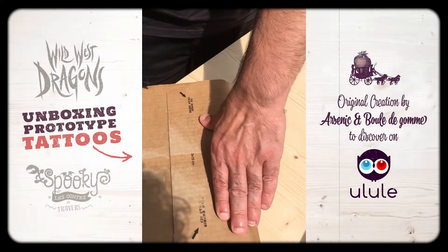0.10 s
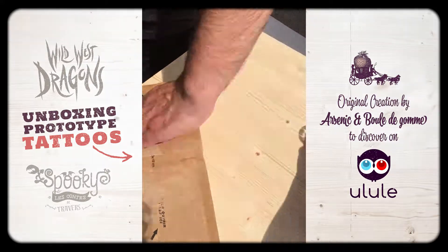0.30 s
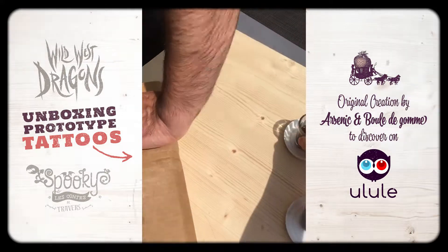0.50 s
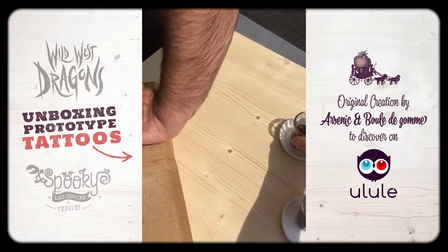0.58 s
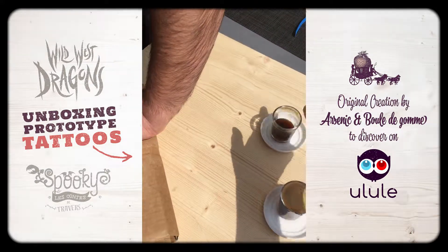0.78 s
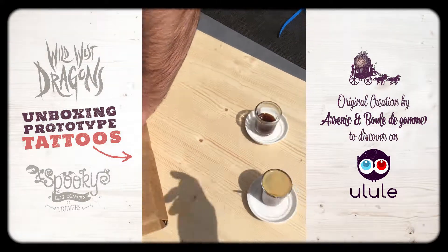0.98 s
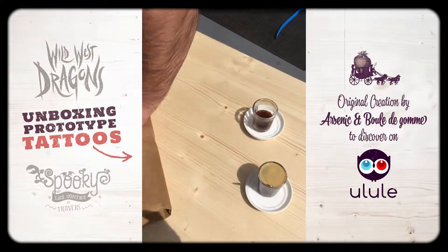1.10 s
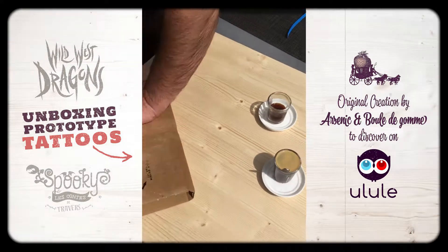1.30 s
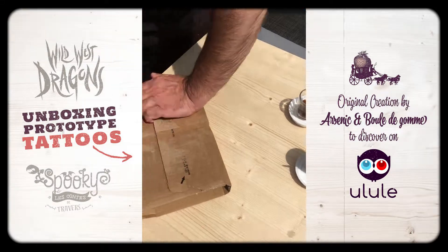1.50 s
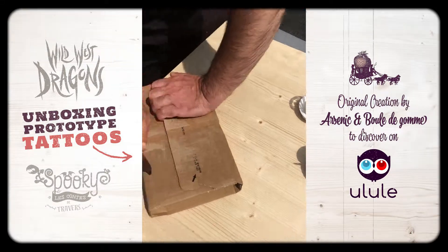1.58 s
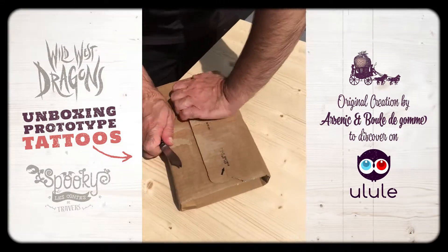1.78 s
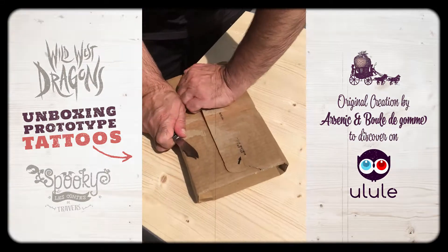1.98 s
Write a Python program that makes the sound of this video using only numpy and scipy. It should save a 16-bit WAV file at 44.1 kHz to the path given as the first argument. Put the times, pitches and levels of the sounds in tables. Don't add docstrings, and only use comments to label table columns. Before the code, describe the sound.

A cardboard parcel is handled and cut open on a wooden table, heard close. Palm rubbing and scraping open, with sharp snaps near 0.2 seconds. A blade clinks and knocks brightly at 0.41, then a dull hand thump at 0.68. Rubbing swells towards 1.0; a loud crack at 1.16 leads to crackly rips until 1.42, more snaps around 1.55, and steady rubbing to the end over quiet air.

```python
import sys
import numpy as np
from scipy import signal
from scipy.io import wavfile

SR = 44100
rng = np.random.default_rng(int(sys.argv[2]) if len(sys.argv) > 2 else 0)


def decibels_to_gain(level_db):
    exponent = np.asarray(level_db, float) / 20
    return 10 ** exponent


def put_to_file(sound):
    columns = np.atleast_2d(sound).T
    safe = np.clip(columns, -1, 1)
    whole_steps = np.round(safe * 32767)
    wavfile.write(sys.argv[1], SR, whole_steps.astype(np.int16))


N = 88200

# time_s, level_db
PALM_RUBS = [
    (0, -48),
    (.09, -46.5),
    (.125, -64),
    (.165, -57),
    (.2, -40),
    (.24, -57.5),
    (.27, -51.5),
    (.285, -65.5),
    (.41, -76),
             (.42, -55.5),
    (.54, -58.5),
    (0.574, -73),
    (0.598, -48.5),
    (0.709, -44),
    (.745, -64.5),
    (0.789, -48.5),
    (.85, -60),
    (0.998, -44.5),
             (1.1, -57),
    (1.21, -56.5),
    (1.33, -46),
    (1.44, -47.5),
    (1.49, -61),
    (1.598, -44.5),
    (1.75, -50.5),
    (1.9, -46.5),
    (2, -44.5),
]
# frequency_hz, level_db (per Hz)
SKIN_TONE = [(290, -5.5), (500, -16.5), (1360, -5.5), (1840, -6.5), (3490, -10), (5020, -15), (5880, -5.5),
             (13100, -10.5), (16000, 36.5)]
# time_s, level_db
DRAG = [(0, -53.5), (.1, -52.5), (.13, -64.5), (.2, -50), (.3, -99), (.4, -63), (.44, -64.5), (.57, -64.5),
        (.68, -76), (.75, -56), (.87, -51.5), (.93, -51), (1.01, -45), (1.2, -55.5), (1.33, -46),
        (1.5, -59), (1.6, -55), (2, -53)]
# frequency_hz, level_db (per Hz)
WOOD_TONE = [(71, -30), (120, -13), (290, -9), (498, -21.5), (627, -17), (738, -19), (1010, -12.5),
             (3790, -21.5), (6000, -28), (7800, -36), (13200, -120)]
# start_s, peak_db, pitch_hz, thud_db
FIBRE_SNAPS = [(.084, -36.5, 2830, -45.5), (.135, -41.5, 7000, -51), (.1415, -35.5, 11000, -52.5),
               (.142, -40, 3500, -58), (.172, -40, 6000, -77), (.1805, -37, 3530, -46),
               (.188, -39, 5000, -63), (.1935, -50, 3000, -70), (.199, -37, 9400, -59),
               (.205, -35, 6000, -64), (.2128, -19, 6100, -38), (.2135, -21.5, 12100, -60),
               (.2145, -22.5, 1060, -56), (.2152, -24, 600, -61), (.2158, -18, 8000, -38.5),
               (.265, -37, 12100, -54.5), (.2732, -24.5, 11600, -54), (.274, -36.5, 890, -46.5),
               (.8628, -34, 1150, -66), (.875, -35, 990, -70), (.884, -56, 1200, -70),
               (1.1335, -41.5, 6000, -75), (1.1372, -35, 2000, -71), (1.1415, -35, 5800, -66),
               (1.149, -33, 2100, -68), (1.1499, -38, 6000, -72), (1.1627, -38, 5800, -73),
               (1.1627, -32, 2800, -70), (1.166, -33, 5800, -67), (1.1662, -37, 2400, -56),
               (1.2805, -38, 9500, -49), (1.2811, -30, 1800, -51), (1.5125, -40.5, 3100, -70),
               (1.5328, -34, 2400, -58), (1.5638, -26, 1300, -45), (1.6028, -30, 2180, -62),
               (1.6049, -28, 4050, -65), (1.6066, -29, 2280, -51), (1.6083, -37, 5550, -73),
               (1.6143, -34, 8500, -60), (1.779, -45, 4000, -62)]
# start_s, peak_db, pitch_hz, thud_db
CRACKS = [
    (0.4118, -16.5, 1930, -46),
    (.413, -15, 1340, -66),
    (0.4175, -22.5, 2230, -56),
    (0.42, -28, 3050, -74),
    (.4115, -19.5, 6200, -40),
    (.6795, -31, 1300, -46.5),
    (.681, -32.5, 780, -72),
    (.6865, -39, 2300, -55),
    (.6802, -40, 4000, -69),
]
# start_s, peak_db, pitch_hz, thud_db
BREAKS = [
    (1.1549, -22.5, 5700, -59),
    (1.1559, -23.5, 2250, -74),
    (1.1562, -11.5, 7530, -72),
    (1.1575, -35, 8900, -63),
    (1.3522, -26, 2200, -62),
    (1.3525, -30.5, 4630, -68),
    (1.3861, -35, 3900, -70),
    (1.5637, -27, 3000, -43.5),
    (1.5645, -35, 6000, -73),
]
# start_s, peak_db, pitch_hz, thud_db
RIPS = [(1.239, -35, 2030, -60), (1.243, -37, 2020, -50), (1.2995, -33.5, 4500, -73),
        (1.3035, -31, 3600, -60), (1.3045, -34, 8000, -70), (1.309, -37.5, 6500, -68),
        (1.313, -36, 3500, -66), (1.3185, -34, 3300, -65), (1.322, -35, 5000, -70), (1.327, -29, 5370, -73),
        (1.3365, -27, 3800, -68), (1.345, -37, 4020, -67), (1.3535, -37, 1400, -54),
        (1.360, -34, 9500, -70), (1.361, -25, 2500, -70), (1.364, -38, 6800, -70),
        (1.396, -41.5, 4000, -57), (1.402, -36, 3300, -72), (1.419, -37, 4500, -51)]
# pitch_hz, level_db, t60_s (time to fade by 60 dB)
CARD_MODES = [(169, -9.5, 0.09), (254, -4.5, 0.013), (350, 4, 0.018), (660, -11.5, 0.017), (977, 5, 0.019),
              (1500, 1.5, 0.01)]
# start_s, level_db
CLINKS = [
    (.4116, -34),
    (.4124, -14),
    (.4172, -28.5),
]
# pitch_hz, level_db, t60_s
BLADE_MODES = [(5280, -4, .09), (5279, -3, .024), (5345, -18, .03), (5560, -18, .03), (6430, -17, .015),
               (6790, -14, .015), (9200, -15, .03), (9310, -7, .03), (9415, 4, .035), (9548, -1, .045),
               (9760, -13, .035), (11820, -26, .11), (13330, -24, .025), (15560, -21, .06)]
# pitch_hz, level_db, t60_s
KNOCK_MODES = [(140, -23, .09), (215, -25.5, 0.16), (262, -25, 0.1), (382, -29, 0.18), (448, -23, 0.04),
               (1075, -3.5, 0.015), (1310, -9, .018), (1675, -8.5, 0.017), (2030, -10.5, .02),
               (2230, -7.5, 0.02), (2650, -18, .016), (3160, -19, .018), (3535, -20, .018)]
# start_s, level_db
THUMPS = [
    (.681, -25.5),
    (.6848, -27.5),
    (.693, -34.5),
    (.708, -50),
]
# pitch_hz, level_db, t60_s
TABLE_MODES = [(226, 3.5, 0.033), (264, -8, .03), (320, -13, 0.041)]
# peak_s, level_db, pitch_hz, length_s
ROCKS = [(.035, -49, 137, 0.075), (.155, -46.5, 298, 0.026), (.44, -42.5, 260, 0.043),
         (.47, -50, 215, 0.049), (.82, -53, 312, 0.073), (1.0, -46, 290, .06), (1.17, -49, 320, .06),
         (1.287, -39, 313, 0.013), (1.287, -43, 160, .05), (1.42, -44.5, 184, 0.035),
         (1.568, -49, 150, 0.058), (1.63, -46.5, 92, 0.062), (1.80, -56, 149, 0.078)]
# frequency_hz, level_db (per Hz)
AIR_TONE = [(15, -34), (25, 6), (59, 15.5), (317, -8), (463, -4.5), (1330, -28.5), (4870, -13.5),
            (11900, -19.5), (16000, -22)]


def rms_one(x):
    return x / np.sqrt(np.mean(x ** 2) + 1e-20)


def level(rows):
    return decibels_to_gain(np.interp(np.arange(N) / SR, *np.transpose(rows)))


def drift(rate_hz):
    r = np.exp(-80 * np.pi * rate_hz / SR)
    noise = rng.standard_normal(N // 40 + 2002)
    slow = signal.lfilter([1], [1, -2 * r, r * r], noise)[2000:]
    return np.interp(np.arange(N) / 40, np.arange(len(slow)), rms_one(slow))


def bandpass(x, edges_hz):
    return signal.sosfilt(signal.butter(2, edges_hz, "band", fs=SR, output="sos"), x)


def friction(tone, patchy_db, grain_db):
    out, together = 0, drift(14)
    edges = 22 * 2 ** np.arange(0, 9.8, .5)
    grain = np.repeat(rng.exponential(1, N // 20 + 1), 20)[:N]
    rough = rng.standard_normal((2, N)) * decibels_to_gain(grain_db * grain)
    hz, db = np.transpose(tone)
    for k, (low, high) in enumerate(zip(edges, edges[1:])):
        band = bandpass(rough[k % 2], [low, high])
        colour_db = np.interp(np.log(low * high) / 2, np.log(hz), db, left=-90, right=-90)
        flicker_db = patchy_db * (.8 * together + .6 * drift(20))
        out = out + band * decibels_to_gain(colour_db + flicker_db)
    return rms_one(out)


def palm_on_card():
    return level(PALM_RUBS) * friction(SKIN_TONE, patchy_db=2.27, grain_db=1.5)


def parcel_on_wood():
    return level(DRAG) * friction(WOOD_TONE, patchy_db=2.5, grain_db=1.5)


def strike(hits, modes, spread_db, rise_s=.0001):
    out, (start_s, db) = np.zeros(N), np.transpose(hits)
    luck = rng.standard_normal((len(modes), len(start_s)))
    for (hz, mode_db, t60_s), mode_luck in zip(modes, luck):
        clicks = np.full(N, 1e-18)
        clicks[(start_s * SR).astype(int)] = decibels_to_gain(db + mode_db + spread_db * mode_luck)
        w = 2 * np.pi * hz / SR
        for sign, fade_s in ((1, t60_s), (-1, rise_s)):
            r = decibels_to_gain(-60 / (fade_s * SR))
            out += sign * signal.lfilter([0, np.sin(w)], [1, -2 * r * np.cos(w), r * r], clicks)
    return out


def snaps(rows, broad_db, t60_s, low_hz, first=3.94, rise_s=.0001):
    length, width = 2000, 1.26
    out, t = np.zeros(N + length), np.arange(length) / SR
    broad_filter = signal.butter(1, [low_hz, 7000], "band", fs=SR)
    for start_s, db, hz, _ in rows:
        noise = rng.standard_normal(length)
        spray = noise * np.abs(noise) * np.minimum(t / rise_s, 1)
        spray = (spray + first * (t == 0)) * decibels_to_gain(-60 * t / t60_s)
        pitched = bandpass(spray, np.clip([hz / width, hz * width], 100, .45 * SR))
        snap = pitched + decibels_to_gain(broad_db) * signal.lfilter(*broad_filter, spray)
        start = int(start_s * SR)
        out[start:start + length] += decibels_to_gain(db) * snap / np.abs(snap).max()
    thuds = [(start_s, thud_db) for start_s, _, _, thud_db in rows]
    return out[:N] + strike(thuds, CARD_MODES, spread_db=4.0)


def fibres():
    out = snaps(FIBRE_SNAPS, -11, t60_s=.0077, low_hz=674)
    out += snaps(CRACKS, -23, t60_s=.0077, low_hz=674)
    out += snaps(BREAKS, -10, t60_s=.0052, low_hz=1690, first=11.0)
    out += snaps(RIPS, -1.3, t60_s=.013, low_hz=1690, first=0, rise_s=.0016)
    return out


def blade_clink():
    ring = strike(CLINKS, BLADE_MODES, spread_db=1.5, rise_s=.0036)
    return ring + strike(CLINKS, KNOCK_MODES, spread_db=1.5)


def table_thump():
    damping = level([(.697, 0), (.703, -9)])
    return strike(THUMPS, TABLE_MODES, spread_db=1.5, rise_s=.0034) * damping


def rocking():
    out, t = np.zeros(N), np.arange(N) / SR
    sag = .1
    for peak_s, db, hz, length_s in ROCKS:
        u = (t - peak_s) / length_s
        cycles = hz * length_s * (u - sag * u ** 2 / 2)
        out += decibels_to_gain(db) * np.exp(-8 * u ** 2) * np.sin(2 * np.pi * cycles)
    return out


def crackle(force):
    per_s, t60_s, pitches = 1500, .004, np.geomspace(800, 7000, 12)
    born = rng.random(N) < per_s * decibels_to_gain(3.0 * drift(12)) / SR
    sizes = decibels_to_gain(1.9 * np.minimum(rng.exponential(1, N), 4))
    pops = born * sizes * rng.choice([-1, 1], N) * force
    dealt = rng.integers(0, 12, N)
    out, r = 0, decibels_to_gain(-60 / (t60_s * SR))
    for k, hz in enumerate(pitches):
        w = 2 * np.pi * hz / SR
        mine = pops * (dealt == k) + 1e-18
        out = out + signal.lfilter([np.sin(w)], [1, -2 * r * np.cos(w), r * r], mine)
    return decibels_to_gain(-10) * out


def room(x):
    t60_s, room_db = .083, -20
    t = np.arange(SR // 4) / SR
    dull = signal.lfilter([1], [1, -.7], rng.standard_normal(len(t)))
    tail = dull * decibels_to_gain(-60 * t / t60_s) * (t > .004)
    return decibels_to_gain(room_db) * signal.fftconvolve(x, tail / np.linalg.norm(tail))[:N]


def open_air():
    return decibels_to_gain(-58.5) * friction(AIR_TONE, patchy_db=1.0, grain_db=1.7)


def scene():
    rub = palm_on_card() + parcel_on_wood()
    hits = fibres() + blade_clink() + table_thump()
    hits = signal.sosfilt(signal.butter(3, 141, "high", fs=SR, output="sos"), hits)
    mix = rub + hits + room(hits) + rocking() + crackle(level(DRAG)) + open_air()
    return mix[None]


def band_limit(x):
    return signal.sosfilt(signal.butter(12, 17030, fs=SR, output="sos"), x)


def record(dry):
    mix = signal.sosfilt(signal.cheby2(12, 30, 16150, fs=SR, output="sos"), dry)
    mix = signal.sosfilt(signal.butter(4, 36, "high", fs=SR, output="sos"), mix)
    return band_limit(mix)


dry = scene()
out = record(dry)
put_to_file(out)
```